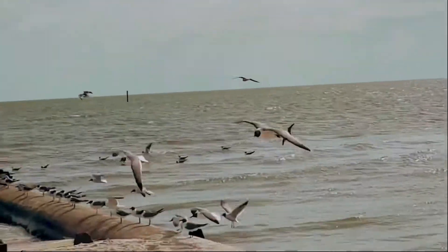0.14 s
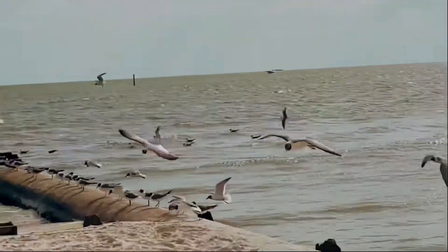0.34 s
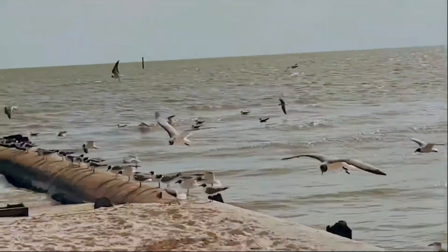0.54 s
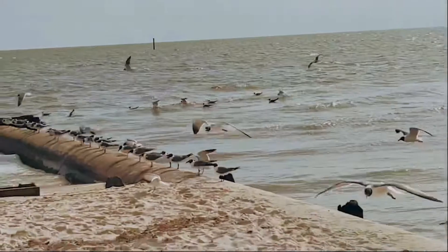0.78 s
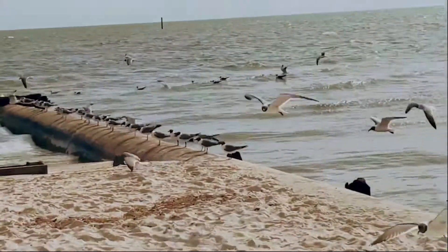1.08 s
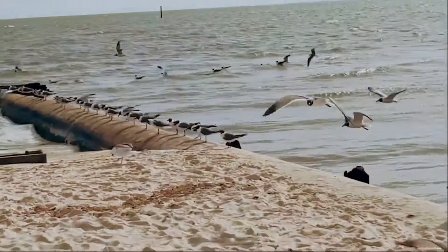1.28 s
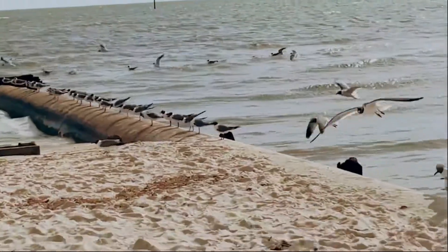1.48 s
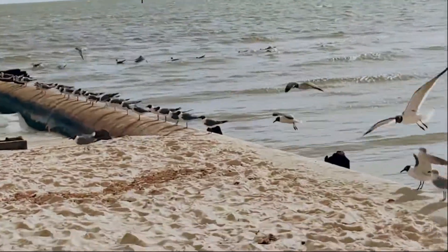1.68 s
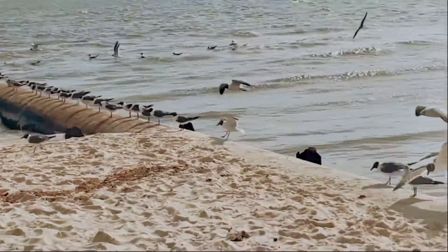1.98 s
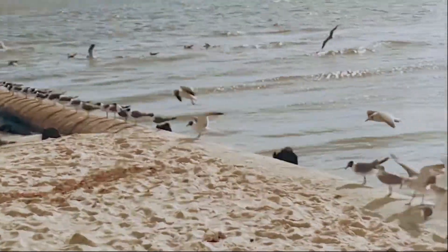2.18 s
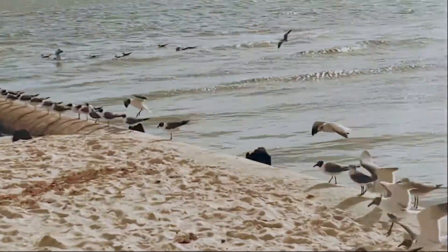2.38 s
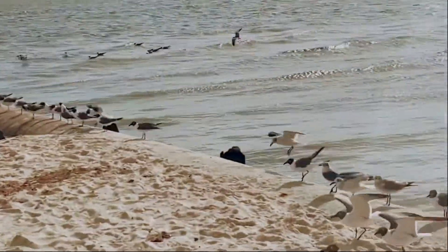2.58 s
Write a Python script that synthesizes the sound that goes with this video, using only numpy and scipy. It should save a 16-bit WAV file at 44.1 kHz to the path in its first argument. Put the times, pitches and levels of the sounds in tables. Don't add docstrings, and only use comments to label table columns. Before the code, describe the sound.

Blustery wind noise dominates a beach, bursting in low thumps and crackles right at the handheld microphone; behind it gulls call sparsely, then brighter and more often, with a faint wash of surf and a few digital ticks.

```python
import sys
import numpy as np
from scipy import signal
from scipy.fft import rfft, irfft
from scipy.io import wavfile
from scipy.ndimage import uniform_filter1d

SR = 44100
rng = np.random.default_rng(int(sys.argv[2]) if len(sys.argv) > 2 else 0)


def invert_db(level):
    return 10 ** (np.asarray(level, dtype=float) / 20)


def waveform_to_disk(signal):
    frames = np.transpose(np.atleast_2d(signal))
    scaled = np.clip(frames, -1, 1) * 32767
    samples = np.round(scaled).astype(np.int16)
    wavfile.write(sys.argv[1], SR, samples)


N = 120834


def read(points, hz):
    f, value = np.transpose(points)
    return np.interp(np.log(hz + 1), np.log(f + 1), value)


def evened(x):
    return x / np.sqrt(np.mean(x ** 2) + 1e-20)


def curve(points):
    return np.interp(np.arange(N) / SR, *np.transpose(points))


def lumps(rate_hz, n=N):
    b, a = signal.butter(2, rate_hz, fs=SR)
    return evened(signal.lfilter(b, a, rng.standard_normal(n)))


# time_s, level_db
SURF_LEVEL = [(0, -45), (.5, -44.5), (.8, -41.5), (1.2, -43.5), (1.6, -45), (2.0, -45), (2.74, -45.5)]
# freq_hz, level_db
SURF_TONE = [(300, -5), (1000, -6), (2000, -4), (3200, -8.5), (5500, -12.5), (8000, -15), (11500, -27),
             (15500, -26.5)]


def surf():
    hop, size = 128, 512
    frames, hz = N // hop + 5, np.fft.rfftfreq(size, 1 / SR)
    real, imag, patches = rng.standard_normal((frames, len(hz), 3)).T
    patches = uniform_filter1d(patches, size=6, axis=0)
    patches = evened(uniform_filter1d(patches, size=20, axis=1))
    level_db = np.interp(np.arange(frames) * hop / SR, *np.transpose(SURF_LEVEL))
    fizz_db = np.outer(np.clip(hz / 10000, 0, 1), level_db - level_db.mean())
    patch_db = 0.9 * patches
    spectrum = (real + 1j * imag) * invert_db(read(SURF_TONE, hz)[:, None] + patch_db + fizz_db)
    hiss = signal.istft(spectrum, nperseg=size, noverlap=size - hop)[1][:N]
    return invert_db(curve(SURF_LEVEL)) * evened(hiss)


def shore_echo(x):
    echo_db, t60_s, length = -11, 0.06, 6000
    t = np.arange(length) / SR
    sign = rng.choice([-1., 1.], length)
    present = rng.random(length) < 0.04
    taps = sign * present * invert_db(-60 * t / t60_s)
    return x + invert_db(echo_db) * signal.fftconvolve(x, taps / np.linalg.norm(taps))[:N]


# freq_hz, phase_turns
PORT_TURN = [(0, 0), (1500, .16), (2500, .01), (6000, .012), (7600, .45), (8900, .55), (10500, .93),
             (12800, 1.07), (14200, 1.45)]


def two_ports(x):
    hz = np.fft.rfftfreq(N, 1 / SR)
    half = np.exp(1j * np.pi * np.interp(hz, *np.transpose(PORT_TURN)))
    return irfft(rfft(x) * np.array([half, 1 / half]), N)


# freq_hz, likeness_0to1
WIND_SAME = [(50, 1), (120, 0.82), (250, 0.71), (500, 0.8), (1000, 0.36), (1800, 0.4)]


def port_noise(tone):
    hz = np.fft.rfftfreq(N, 1 / SR)
    a, b = rfft(rng.standard_normal((2, N)))
    same = np.clip(read(WIND_SAME, hz), 0, 1)
    mid = a * np.sqrt((1 + same) / 2)
    side = b * np.sqrt((1 - same) / 2)
    treble_loss = np.minimum(tone[-1][0] / (hz + 1), 1) ** 6
    gain = invert_db(read(tone, hz)) * treble_loss
    return evened(irfft(np.array([mid + side, mid - side]) * gain, N))


# time_s, level_db
WIND_LEVEL = [(0, -25.5), (.12, -31), (.26, -32.5), (.3, -29.5), (.38, -38.5), (.5, -40.5), (.56, -52),
              (.69, -37.5), (.75, -41), (.8, -33), (1.17, -30), (1.28, -40), (1.42, -38), (1.6, -30.5),
              (1.76, -37), (2.06, -30), (2.22, -32), (2.74, -33.5)]
# freq_hz, level_db
RUMBLE_TONE = [(25, -60), (45, 2), (70, 4), (130, 0.5), (250, -31.5), (500, -69)]
# freq_hz, level_db
FLUTTER_TONE = [(60, -30), (150, 5), (350, -3.5), (600, -7.5), (900, -15.5), (1300, -28.5)]


def buffeting():
    wind_db = curve(WIND_LEVEL)
    rumble = port_noise(RUMBLE_TONE)
    rumble_db = -29.5 + 0.25 * (wind_db - wind_db.mean()) + 2 * lumps(4.3)
    flutter = port_noise(FLUTTER_TONE)
    gust_db = 1.2 * lumps(12)
    flutter_db = wind_db + 1.5 + gust_db + 4.5 * lumps(98)
    return rumble * invert_db(rumble_db) + flutter * invert_db(flutter_db)


# centre_s, peak_db, length_s
EDDIES = [(0.032, -20, 0.047), (0.06, -20, 0.012), (0.104, -9.5, 0.019), (0.114, -18, 0.013),
          (0.19, -10.5, 0.016), (0.208, -19.5, 0.018), (0.235, -16.5, 0.022), (0.286, -19, 0.039),
          (0.829, -12.5, 0.014), (0.987, -26.5, 0.022), (1.055, -16, 0.018), (1.066, -12.5, 0.013),
          (1.094, -16.5, 0.019), (1.194, -13, 0.027), (1.448, -17.5, 0.015), (1.486, -14.5, 0.017),
          (1.541, -17, 0.026), (1.562, -12, 0.023), (1.695, -17, 0.04), (1.802, -22, 0.016),
          (1.928, -12.5, 0.031), (1.961, -8, 0.027), (2.025, -13.5, 0.043), (2.072, -9.5, 0.035),
          (2.122, -11, 0.032), (2.165, -19.5, 0.022), (2.247, -23, 0.016), (2.367, -21.5, 0.087),
          (2.585, -21, 0.041), (2.608, -19, 0.014), (2.685, -15.5, 0.017), (2.73, -22.5, 0.016)]
# centre_s, peak_db, length_s
SMALL_EDDIES = [(0.506, -25, 0.074), (0.621, -26, 0.037), (0.689, -22.5, 0.034), (.87, -29, 0.016),
                (0.896, -18.5, 0.04), (0.971, -35, 0.028), (1.255, -29, 0.049), (1.329, -21.5, 0.026),
                (1.4, -29, 0.028), (1.776, -24.5, 0.016), (1.861, -19, 0.022)]
# freq_hz, level_db
EDDY_TONE = [(60, 3), (150, 0), (300, -4.5), (600, -13.5), (1000, -19), (1500, -24)]


def eddies():
    out = np.zeros((2, N))
    swirl = port_noise(EDDY_TONE)
    crackle_db = 4 * lumps(150)
    swirl = swirl * invert_db(crackle_db)
    for centre_s, peak_db, length_s in EDDIES + SMALL_EDDIES:
        u = np.arange(0, 1, 1 / max(length_s * SR, 100))
        at = round((centre_s - length_s / 2) * SR) + np.arange(len(u))
        hump = np.sin(np.pi * u ** 0.98)
        out[:, at] += invert_db(peak_db) * 0.56 * evened(swirl[:, at] * hump)
    return out


# centre_s, peak_db
POPS = [(0.087, -8.5), (0.094, -6.5), (0.103, -8), (0.108, -16), (0.119, -10.5), (0.127, -7), (0.159, -24),
        (0.174, -9), (0.189, -20), (0.202, -17), (0.21, -37), (0.22, -4.0), (0.237, -32), (0.781, -15),
        (0.813, -13), (0.819, -15.5), (0.826, -14.5), (1.051, -21), (1.06, -7.0), (1.077, -14),
        (1.102, -18), (1.147, -17), (1.153, -17.0), (1.173, -15), (1.191, -10.5), (1.201, -21),
        (1.473, -20), (1.479, -5.5), (1.558, -13.0), (1.57, -9), (1.6, -7.5), (1.606, -18.0), (1.675, -15),
        (1.69, -22), (1.696, -17.0), (1.856, -20.5), (1.904, -15.5), (1.927, -3), (1.943, -9.0),
        (1.949, -7.5), (1.959, -9), (2.008, -21), (2.02, -15.0), (2.044, -15.5), (2.064, -5.5),
        (2.072, -15), (2.101, -15.5), (2.111, -12.5), (2.12, -18), (2.143, -15.0), (2.163, -13),
        (2.327, -16.5), (2.5, -16), (2.581, -16), (2.601, -19), (2.69, -12), (2.701, -14.0), (2.706, -14),
        (2.735, -11.5), (0.682, -21.5)]


def pops():
    ring_hz, hz_per_db, scatter = 600, 7, 0.15
    cycles, sag, gain_db, spread_db = 0.78, 0.51, -2, 4.5
    out, t = np.zeros((2, N)), np.arange(-300, 300) / SR
    draws = rng.uniform(-1.09, 1, (len(POPS), 3))
    for (centre_s, peak_db), (turn, side, tune) in zip(POPS, draws):
        u = t * (ring_hz + hz_per_db * peak_db) * (1 + scatter * tune)
        phase = 2 * np.pi * (u - sag * u ** 2 / 2) + np.pi * turn
        ring = np.exp(-(u / cycles) ** 2 / 2) * np.cos(phase)
        at = np.clip(round(centre_s * SR) + np.arange(len(t)) - len(t) // 2, 0, N - 1)
        side_db = spread_db * side * np.array([[1], [-1]])
        out[:, at] += invert_db(peak_db + gain_db + side_db) * ring
    return out


def wind():
    return buffeting() + eddies() + pops()


# freq_hz, level_db
AIR = [(8500, 0), (16000, -32)]


def gulls(cries, efforts, throat):
    edge_s, wobble, rasp_db = 0.011, 0.004, -13
    fading_db, fading_hz = 2, 18
    push_db = 4.0
    out = np.zeros(N)
    for cry, (level_db, bright_db, drift_db) in zip(cries, efforts):
        s, pitch_hz = np.transpose(cry)
        at = np.arange(round(s[0] * SR), min(round(s[-1] * SR), N))
        t = at / SR
        hz = uniform_filter1d(np.interp(t, s, pitch_hz), size=200, mode="nearest")
        hz = hz * (1 + wobble * lumps(41, len(t)))
        turn = 2 * np.pi * np.cumsum(hz) / SR
        k = np.arange(1, 19)[:, None]
        tilt_db = bright_db * np.log2(np.maximum(k * hz / 1800, 1))
        colour = invert_db(read(throat, k * hz) + read(AIR, k * hz) + tilt_db) * (k * hz < 16000)
        colour = colour * invert_db(fading_db * np.array([lumps(fading_hz, len(t)) for _ in k]))
        voice = (colour * np.cos(k * turn + k * k)).sum(0)
        rasp = 1 + invert_db(rasp_db) * lumps(400, len(t))
        unfinished = at[-1] > N - 400
        edge = np.clip(np.minimum(t - s[0], s[-1] + unfinished - t) / edge_s, 0, 1)
        drift = drift_db * ((t - s[0]) / (s[-1] - s[0]) - 0.5)
        effort = invert_db(level_db + drift + push_db * np.log2(hz / hz.max()))
        out[at] += np.sqrt(2) * effort * edge * rasp * voice
    return out


# time_s, pitch_hz
FAR_CRIES = [
    [(.25, 640), (.277, 715), (.288, 854), (.308, 869), (.326, 855), (.344, 806), (.365, 680)],
    [(.395, 924), (.42, 887), (.465, 883)],
    [(1.365, 773), (1.39, 820), (1.425, 793), (1.46, 923)],
    [(1.45, 640), (1.475, 755), (1.486, 838), (1.514, 851), (1.53, 830), (1.547, 772), (1.565, 670)],
    [(1.63, 637), (1.66, 715), (1.695, 870)],
    [(2.27, 670), (2.3, 746), (2.35, 735), (2.385, 652)],
]
# level_db, brightness_db_per_octave, drift_db
FAR_EFFORT = [(-45, -.3, 1), (-52, -7, .1), (-50, -8, .1), (-44.5, -.8, 1), (-50, -8, .1), (-44.5, -10, .1)]
# freq_hz, level_db
FAR_THROAT = [(900, -14), (1600, 4), (2550, -5), (3400, -18), (4250, -2), (4900, -12), (6050, -4),
              (7500, -20)]


def far_gulls():
    return gulls(FAR_CRIES, FAR_EFFORT, FAR_THROAT)


# time_s, pitch_hz
MID_CRIES = [
    [(.746, 1110), (.761, 1065), (.809, 912), (.824, 922), (.846, 987), (.864, 995), (.884, 972),
     (.91, 840)],
    [(.895, 850), (.912, 876), (.934, 913), (.95, 912), (.966, 863), (.982, 730)],
    [(1.708, 728), (1.73, 798), (1.752, 892), (1.791, 1026), (1.802, 965), (1.814, 860), (1.826, 700)],
]
# level_db, brightness_db_per_octave, drift_db
MID_EFFORT = [(-42.5, -0.88, -5), (-46.5, -0.38, 3), (-43, -2.2, 4.5)]
# freq_hz, level_db
MID_THROAT = [(1000, -6), (1950, 1), (3100, -4), (3700, -5), (5000, -2), (5800, -6.5), (6900, -3),
              (9000, -14)]


def mid_gulls():
    return gulls(MID_CRIES, MID_EFFORT, MID_THROAT)


# time_s, pitch_hz
NEAR_CRIES = [
    [(1.985, 735), (2.005, 910), (2.043, 1040), (2.054, 1143), (2.088, 1186), (2.105, 1135), (2.115, 955),
     (2.133, 730)],
    [(2.244, 735), (2.263, 920), (2.295, 1030), (2.308, 1168), (2.326, 1191), (2.352, 1155), (2.363, 970),
     (2.382, 700)],
    [(2.484, 770), (2.5, 928), (2.533, 1040), (2.546, 1178), (2.566, 1194), (2.586, 1155), (2.597, 965),
     (2.612, 780)],
]
# level_db, brightness_db_per_octave, drift_db
NEAR_EFFORT = [(-40.5, 0.106, 0), (-38, 0.15, -4.5), (-36.5, .1, -3)]
# freq_hz, level_db
NEAR_THROAT = [(1100, -8), (2000, -2), (3050, -2.5), (4750, -4), (5250, -21), (6000, -7.5), (6800, -14.5),
               (7500, -51)]


def near_gulls():
    return gulls(NEAR_CRIES, NEAR_EFFORT, NEAR_THROAT)


# time_s, pitch_hz
CLOSE_CRIES = [
    [(2.612, 690), (2.64, 802), (2.664, 823), (2.69, 862), (2.71, 933), (2.72, 940)],
    [(2.7, 895), (2.71, 932), (2.72, 940), (2.74, 936)],
    [(2.703, 740), (2.715, 856), (2.73, 950), (2.74, 960)],
    [(.188, 618), (.214, 660), (.245, 639), (.27, 691), (.285, 744)],
]
# level_db, brightness_db_per_octave, drift_db
CLOSE_EFFORT = [(-42.5, 0.2, -7), (-37, -1.8, 4), (-40.5, -7, 22), (-47, -6, -14)]
# freq_hz, level_db
CLOSE_THROAT = [(1900, -2.5), (3000, -3), (3800, 3.5), (4600, -3), (5600, 0.5), (6500, -23), (8500, -38),
                (11000, -9)]


def close_gulls():
    return gulls(CLOSE_CRIES, CLOSE_EFFORT, CLOSE_THROAT)


def scene():
    birds = far_gulls() + near_gulls() + mid_gulls()
    return wind() + two_ports(surf() + shore_echo(birds + close_gulls()))


# freq_hz, left_minus_right_db
PORT_LEAN = [(700, 0), (1300, 5), (2600, 0)]


def port_lean(x):
    half = invert_db(read(PORT_LEAN, np.fft.rfftfreq(N, 1 / SR)) / 2)
    return irfft(rfft(x) * np.array([half, 1 / half]), N)


# time_s, left_jump, right_jump (full scale = 1)
SKIPS = [
    (.60616, .035, .04),
    (1.09281, -.66, -.55),
    (1.6028, .23, .12),
    (2.08947, -.11, -.1),
    (2.5995, .13, .12),
    (2.7398, .1, .1),
]


def skip_ticks():
    heal_s, jump_samples = 0.001, 0.14
    out, t = np.zeros((2, N)), np.arange(N) / SR
    for s, left, right in SKIPS:
        jump = np.tanh((t - s) * SR / jump_samples) * np.exp(-abs(t - s) / heal_s) / 2
        out += np.outer([left, right], jump)
    return out


def low_pass(x):
    return signal.sosfilt(signal.butter(12, 15850, fs=SR, output="sos"), x)


def record(dry):
    low_cut_hz, limit = 43.5, 0.95
    b, a = signal.butter(3, low_cut_hz, "high", fs=SR)
    cut = signal.lfilter(b, a, port_lean(dry))
    mix = limit * np.tanh(cut / limit) + skip_ticks()
    return low_pass(mix)


dry = scene()
out = record(dry)
waveform_to_disk(out)
```